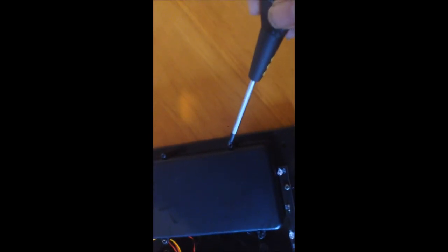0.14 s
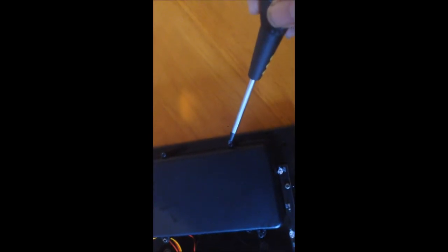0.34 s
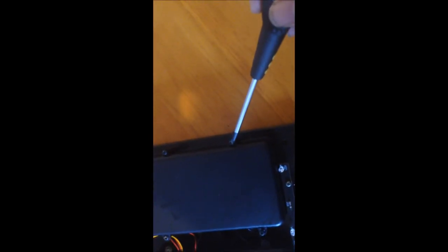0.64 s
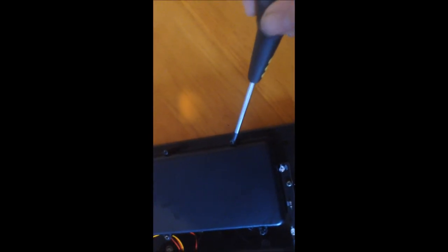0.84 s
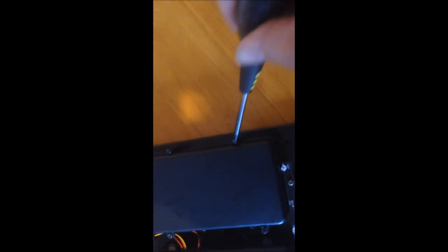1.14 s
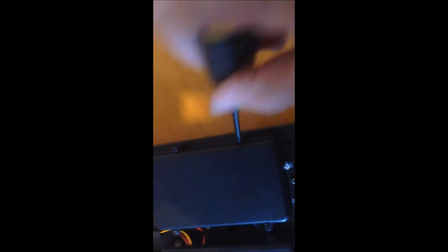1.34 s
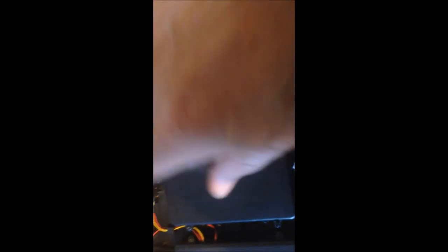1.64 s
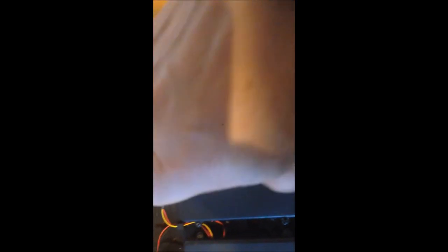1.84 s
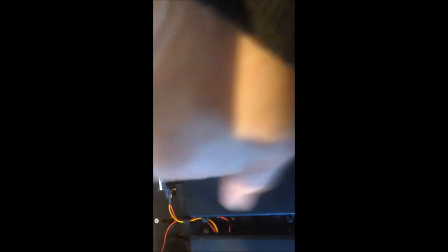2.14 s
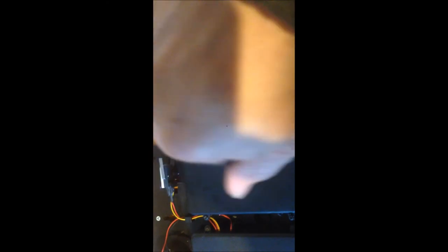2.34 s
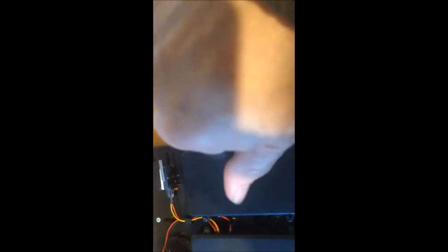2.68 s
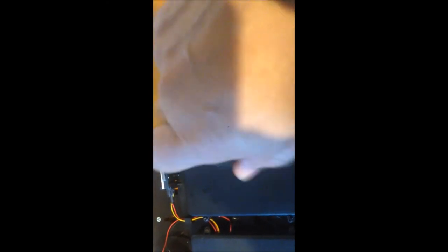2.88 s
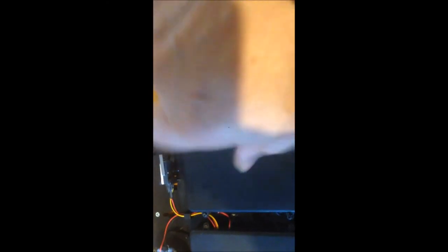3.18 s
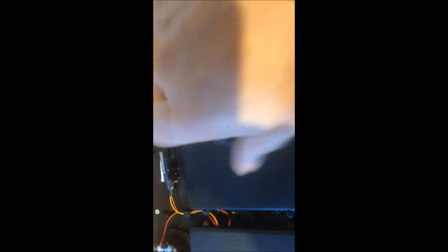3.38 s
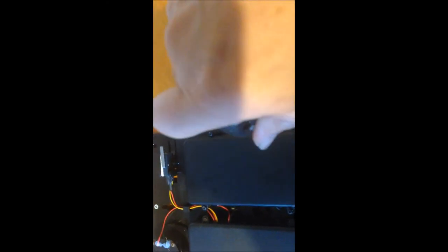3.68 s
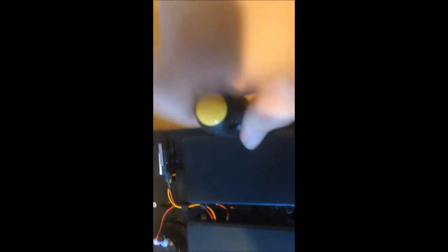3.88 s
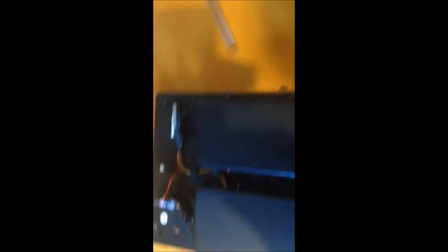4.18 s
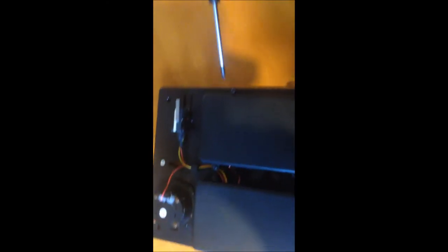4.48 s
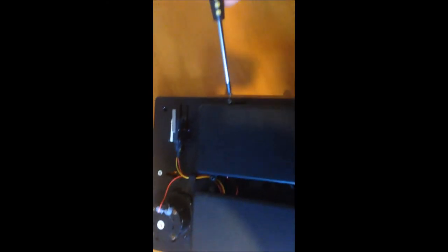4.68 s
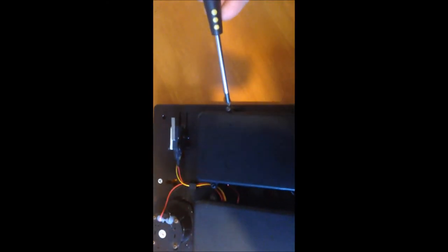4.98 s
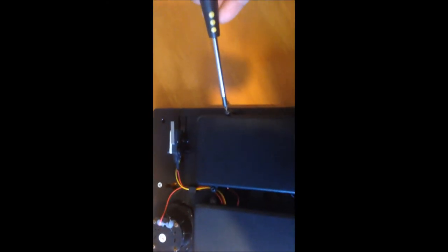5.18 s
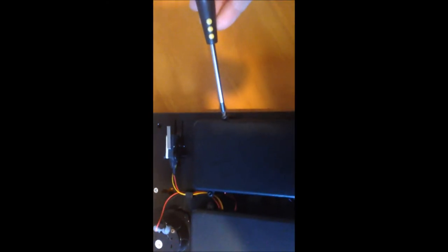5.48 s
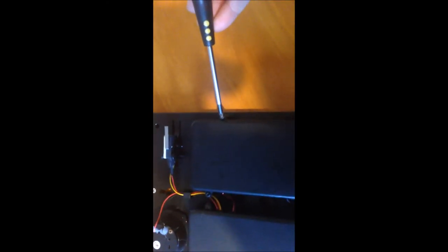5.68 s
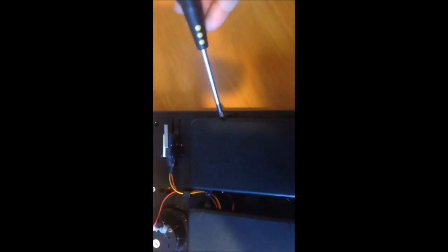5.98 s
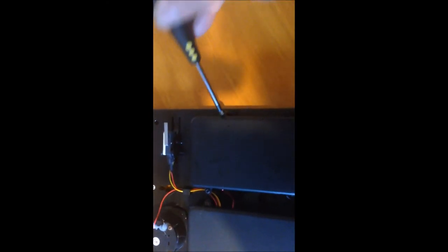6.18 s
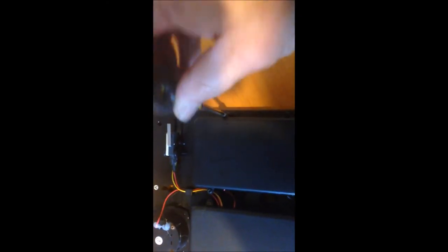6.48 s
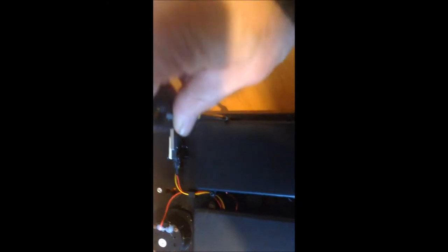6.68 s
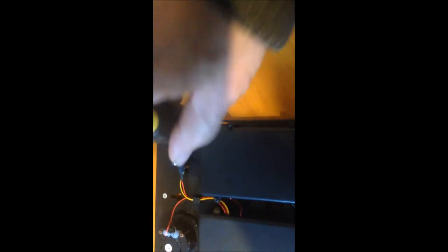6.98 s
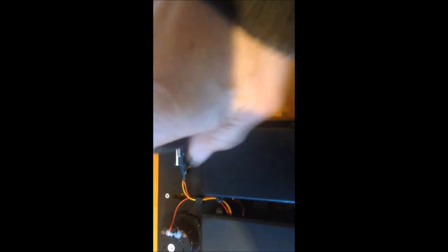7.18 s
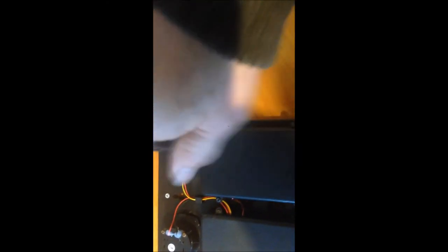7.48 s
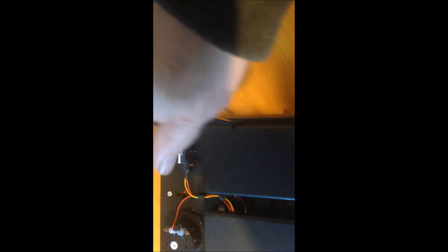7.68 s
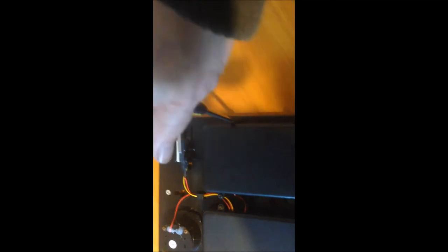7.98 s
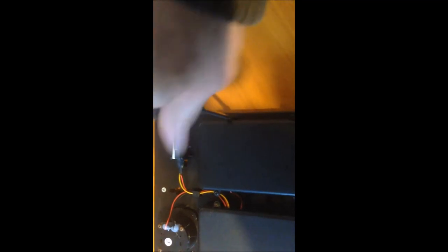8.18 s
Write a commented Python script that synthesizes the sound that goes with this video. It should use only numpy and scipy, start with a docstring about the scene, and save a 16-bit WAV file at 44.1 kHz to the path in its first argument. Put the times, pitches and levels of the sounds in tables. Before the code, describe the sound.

Close, dry clicks and hollow knocks of a screwdriver on a plastic case, loudest early on, followed by light rubbing, small chirps and dull bumps.

```python
"""Screwdriver on a plastic cover

A screwdriver works the screws of a plastic cover on a hollow case, close by in a small quiet room.
The tip taps, scrapes and snaps into a screw head, slips as it is turned, then moves to a second screw.
Contacts are noise bursts ringing decaying plate modes; scrapes are rough noise ringing the same modes.
Caught tips chirp as narrow-band noise; the hand, the leaning case and the rumble and hiss are shaped noise.
"""
import sys
import numpy as np
from scipy import signal
from scipy.fft import rfft, irfft, next_fast_len
from scipy.io import wavfile
from scipy.ndimage import map_coordinates

SR = 44100
rng = np.random.default_rng(int(sys.argv[2]) if len(sys.argv) > 2 else 0)


def dump_mix(stems):
    """Bounce the given channels to the path in sys.argv[1] as a 16-bit WAV at rate SR."""
    frames = np.atleast_2d(stems).T  # one column per channel
    limited = np.clip(frames, -1, 1)  # hard clip at full scale
    pcm = np.round(limited * 32767).astype(np.int16)
    wavfile.write(sys.argv[1], SR, pcm)


N = 367397  # samples


def amp(db):
    """Logarithmic level: decibels to amplitude gain."""
    return 10 ** (np.asarray(db) / 20)


def unit(x):
    """Normalisation: x scaled to rms 1."""
    return x / np.sqrt(np.mean(x ** 2) + 1e-20)


def along(points, hz):
    """Interpolation of (frequency, value) points on a logarithmic frequency axis."""
    f, v = np.transpose(points)
    return np.interp(np.log(hz + 1), np.log(f + 1), v)


def filtered(x, response):
    """Linear filtering: the spectrum of x times a response of frequency."""
    m = next_fast_len(len(x) + 8192)
    hz = np.fft.rfftfreq(m, 1 / SR)
    return irfft(rfft(x, m) * response(hz), m)[:len(x)]


def noise(spectrum, size):
    """Spectral shaping: white noise coloured by (Hz, dB) points, at rms 1."""
    white = rng.standard_normal(size)
    return unit(filtered(white, lambda hz: amp(along(spectrum, hz))))


def fade(t, t60):
    """Exponential free decay, 60 dB down after t60 seconds."""
    return np.exp(-np.log(1000) * t / np.maximum(t60, 1e-4))


def add(track, s, sound):
    """Superposition: mix a sound into the track at time s."""
    start = max(round(s * SR), 0)
    track[start:start + len(sound)] += sound[:max(len(track) - start, 0)]


# Spectrum of the room rumble and hiss: freq_hz [Hz], relative level_db [dB]
AIR_SPECTRUM = [(20, -41), (40, -28.5), (65, -19), (110, -10), (150, -1.5), (300, -2.5), (450, -14.5),
                (650, -17), (1100, -23), (1700, -17.5), (2600, -16.5), (4200, -15.5), (8000, -19.5),
                (14000, -21)]


def background(level_db=-63.5):
    """Stationary noise: steady room rumble and microphone hiss."""
    return amp(level_db) * noise(AIR_SPECTRUM, N)


def wobble(t, rate):
    """Random modulation: a smooth random curve over the times t, with rate knots a second."""
    knots = rng.standard_normal(int(t[-1] * rate) + 4)
    return map_coordinates(knots, [t * rate])


def spell(t, start, end, ease):
    """Gaussian-edged gate: 1 from start to end, easing in before and out after."""
    return np.exp(-((t - np.clip(t, start, end)) / ease) ** 2)


# Spectrum of the hand rubbing the case: freq_hz [Hz], relative level_db [dB]
RUB_SPECTRUM = [(25, -17), (75, -0.5), (140, -5), (290, -0.5), (500, -7), (1000, -12.5), (1600, -27),
                (5000, -28)]
# The hand shifts on handle and case: start_s [s], end_s [s], level_db [dB, before the trim in hand()]
HAND_SHIFTS = [(1.163, 1.377, -60.5), (1.9, 2.03, -58.5), (2.357, 3.4, -61.5), (3.95, 4.15, -66.5),
               (5.164, 5.686, -63.5), (6.942, 7.25, -62), (7.506, 8.332, -64)]


def hand(rest_db=-67.5, ease_s=.14, trim_db=-4, lumpy_db=3, rate=22):
    """Friction noise with powers added: dull, uneven rubbing of the case, louder at each shift."""
    t = np.arange(N) / SR
    power = amp(rest_db) ** 2  # the hand merely holding on
    for start, end, db in HAND_SHIFTS:
        power = power + amp(db) ** 2 * spell(t, start, end, ease_s)
    pushes = amp(trim_db + lumpy_db * wobble(t, rate))
    return np.sqrt(power) * pushes * noise(RUB_SPECTRUM, N)


# Reverberation time of the room: freq_hz [Hz], t60_s [s]
ROOM_DECAY = [(100, 0.27), (260, 0.3), (700, 0.23), (1900, 0.19), (5000, 0.15), (12000, .12)]
# Colour of the room's answer: freq_hz [Hz], gain_db [dB]
ROOM_COLOUR = [(250, 0), (900, -5), (2000, -2), (4000, -8.5), (6000, -1), (12000, -12)]


def in_room(x, wet_db, gap_s=.006):
    """Reverberation by convolution: x plus a fresh noise tail whose treble is weaker and dies first."""
    hz, t, z = signal.stft(rng.standard_normal(SR // 2), SR, nperseg=256)
    decaying = z * fade(t, along(ROOM_DECAY, hz)[:, None])
    tail = signal.istft(decaying, SR, nperseg=256)[1]
    tail = np.pad(tail / np.linalg.norm(tail), (round(gap_s * SR), 0))
    tail = filtered(tail, lambda f: amp(along(ROOM_COLOUR, f)))
    return x + amp(wet_db) * signal.fftconvolve(x, tail)[:len(x)]


# Modes of the cover; their strength depends on how the tip bears on it: freq_hz [Hz], t60_s [s],
# loose_db [dB, tip loose on the first screw], pressed_db [dB, pressed into it],
# second_db [dB, at the second screw]
COVER_MODES = [(74.66, 0.12, -25, -18, -13.5), (114.4, 0.18, -15, -13, -12), (142, .22, -12, -10, -10.5),
               (217, 0.13, -20, -10, -11.5), (276.3, 0.16, 1, -1, -13.5), (331.6, 0.082, -7.5, 2, -3),
               (436, 0.07, -10, -5.5, -6.5), (539, 0.047, -4, -6, -9), (683.5, 0.054, -1.5, -9.5, -7.5),
               (875, 0.05, 0.5, -11, -8), (965, 0.046, 0, -2.5, 6.5), (1085.7, .055, -1.5, -3, -7),
               (1159, 0.069, -5, -9.5, -16), (1386, 0.085, -21, -19.5, -37), (1516, 0.05, -17.5, -17, -10),
               (1723, 0.085, -14.5, -15, -17), (2240, 0.017, -5.5, -26, -7), (2534, 0.061, -16.5, -20, -12),
               (2745, 0.078, -8, -17, -9.5), (2964, 0.026, -5, -1.5, -4), (3450, 0.026, -1, 0, -2.5),
               (3780, .03, -11.5, -9, 4), (4163, 0.034, -5, -10, -2), (4760, 0.02, -12, -27, -10),
               (6560, 0.031, -22.5, -22, -39)]
PRESSED_S, SECOND_SCREW_S = 2.9, 4.5  # when the tip goes in, and when it is at the second screw


def cover_ring(s, t, scatter_db=2.5, build_cycles=0.39):
    """Modal superposition: plate modes answer a tap at time s, building up as the wave crosses."""
    hz, t60, *levels = np.transpose(COVER_MODES)[:, :, None]
    bearing = int(s > PRESSED_S) + int(s > SECOND_SCREW_S)
    level = levels[bearing] + scatter_db * rng.standard_normal(hz.shape)
    build = 1 - np.exp(-t / (build_cycles / np.maximum(hz, 600)))
    vibration = np.sin(2 * np.pi * (hz * t + rng.random(hz.shape)))  # random phases
    return np.sum(amp(level) * build * fade(t, t60) * vibration, axis=0)


# Spectrum of loose parts in the case: freq_hz [Hz], relative level_db [dB]
RATTLE_SPECTRUM = [(60, -12.5), (250, 0.5), (500, 6), (1000, -1.5), (1500, -4), (2400, -4.5), (4000, -7.5),
                   (6000, -20), (12000, -40.5)]


def rattle(t, t60=0.28, lumpy_db=3.0, rate=260, delay_s=0.0097):
    """Secondary excitation: loose parts buzz on in uneven bursts after a blow."""
    bursts = amp(lumpy_db * wobble(t, rate))
    onset = 1 - np.exp(-(t / delay_s) ** 2)
    return noise(RATTLE_SPECTRUM, len(t)) * bursts * fade(t, t60) * onset


def causal(gain):
    """Minimum phase by the folded cepstrum: the response has this gain and nothing precedes the blow."""
    cepstrum = irfft(np.log(np.maximum(gain, 1e-6)))
    half = len(cepstrum) // 2
    cepstrum[1:half] *= 2
    cepstrum[half + 1:] = 0
    return np.exp(rfft(cepstrum))


# Edges of the adjoining bands in which a blow is balanced: freq_hz [Hz]
BANDS = [30, 200, 380, 750, 1400, 2500, 5500, 15000]


def voiced(blow, levels_db):
    """Band equalisation: the blow's first 25 ms are lifted towards the given level in each band."""
    spectrum, hz = rfft(blow), np.fft.rfftfreq(len(blow), 1 / SR)
    points = []
    for lo, hi, db in zip(BANDS, BANDS[1:], levels_db):
        opening = irfft(spectrum * (hz > lo) * (hz < hi))[:SR // 40]
        lift_db = db - 20 * np.log10(np.std(opening))
        # a plateau within the band, sloping to its neighbours
        points += [(lo * 1.15, lift_db), (hi / 1.15, lift_db)]
    return irfft(spectrum * causal(amp(along(points, hz))))


# Contacts of the tip: start_s [s], level_db [dB, before the band colours below],
# weight_db [dB, weight behind the tip], hollow_db [dB, hollow ring], sharpness [dB per octave]
TIP_CONTACTS = [(.2549, -39, -6, 3, 1.5), (.324, -62.5, 8, 3.5, 1.5), (.4991, -49, -9, 3, 3.5),
                (.5825, -39.5, -16, 8, 2), (.6823, -36.5, -7, 4.5, 6.3), (1.047, -74.5, 15, 10, -6),
                (1.2669, -33.5, -1, 3, 1.4), (1.7977, -17.5, -10, -2, 0), (2.248, -59.5, 8, 1.5, -1.5),
                (2.37, -59, 3.5, 0, -1), (2.551, -67.5, 11, -1, 2.5), (2.672, -46.5, 2.5, 3, -0.1),
                (2.829, -44.5, 1, 1, -7), (2.845, -54.5, 7, 3, -5), (2.9579, -55, 4, 4.5, 0.8),
                (3.0075, -49.5, -1, -6, -5), (3.1339, -27.5, -5.5, -2.5, 0.3), (3.239, -57.5, 4, 1, -2.5),
                (3.3031, -56.5, 1, -2, -3), (3.3245, -61, 2.5, 0, 4.5), (3.4485, -29, -5.5, -1.5, -1.5),
                (3.554, -55.5, 2.5, 2.5, -3), (3.9256, -41.5, -0.5, 0.5, -10.5),
                (4.0035, -45, 8.5, 1, -3.2), (4.936, -64.5, 7.5, -3, 4), (5.4358, -40.5, -12, 4, 6),
                (6.4723, -47, -8, -1, -8), (6.497, -59, 2, 0, -1), (6.528, -52.5, -5, 0.5, -7),
                (6.643, -64.5, 5.5, -1, 1), (6.846, -62.5, 1, 6, -1), (7.1253, -63.5, 7, 3, 1),
                (7.148, -49, -4.5, -0.5, -4.5), (7.5323, -44.5, -16.5, 1, -6), (7.663, -59.5, 1, 0.5, 0),
                (7.694, -77.5, 16, -4, 4), (7.847, -52.4, -4.5, 0, -5.5), (7.9508, -53.5, -2, -2, -5.5),
                (8.131, -58, 1, -2.5, -8), (8.2509, -60.5, 9, -0.5, -7)]
# Spectrum of the contact noise: freq_hz [Hz], relative level_db [dB]
CRACK_SPECTRUM = [(30, -23.5), (300, 3.5), (900, -1.5), (1600, -10.5), (3800, -1.5), (6000, -13),
                  (9000, -24), (15000, -36)]
# Colour of an ordinary contact: freq_hz [Hz], level_db [dB]
CONTACT_TONE = [(77, -9.5), (276, -0.5), (534, -2), (1025, -1), (1870, -12.5), (3700, -10), (9000, -24.5)]
# Weight behind the tip booms the case: freq_hz [Hz], share of weight_db [dB per dB]
WEIGHT_SHARE = [(77, 1.6), (276, .8), (534, .55), (1025, 0.013)]
# A tip that does not damp the cover lets it ring hollow: freq_hz [Hz], share of hollow_db [dB per dB]
HOLLOW_SHARE = [(77, -0.6), (276, 0.97), (534, -.3), (1025, 0)]
# A sharp tip lifts the treble and spares the body: freq_hz [Hz], lift [octaves]
SHARP_LIFT = [(276, 0), (534, 0.02), (1025, 0), (1870, 0.8), (3700, 2), (9000, 2.5)]
# A contact at FIRM_DB or above chatters for CHATTER_S; twice as long for each such drop in level
CHATTER_S, FIRM_DB, CHATTER_DOUBLES_DB = .0055, -36.5, 33


def contacts(rows, wet_db=-8, rattle_db=-9, rattle_growth=0.24, rise_share=0.27):
    """Impact excitation: brief chatter rings the cover; lighter contacts are longer and softer in onset."""
    track, t = np.zeros(N), np.arange(SR // 2) / SR
    hz = np.sqrt(np.multiply(BANDS[:-1], BANDS[1:]))  # band centres
    for s, db, weight_db, hollow_db, sharpness in rows:
        levels = db + along(CONTACT_TONE, hz)
        levels = levels + weight_db * along(WEIGHT_SHARE, hz)
        levels = levels + hollow_db * along(HOLLOW_SHARE, hz)
        levels = levels + sharpness * along(SHARP_LIFT, hz)
        chatter_s = CHATTER_S * 2 ** (max(FIRM_DB - db, 0) / CHATTER_DOUBLES_DB)
        crack = noise(CRACK_SPECTRUM, len(t)) * np.exp(-(t / chatter_s) ** 2)
        press = 1 - np.exp(-t / (rise_share * chatter_s))
        blow = in_room(press * (cover_ring(s, t) + crack), wet_db)
        # a harder blow shakes the loose parts more than in proportion
        shaken = amp(rattle_db + rattle_growth * max(levels)) * rattle(t)
        add(track, s, voiced(blow + shaken, levels))
    return track


# The tip drags over the plastic: crest_s [s], level_db [dB, at the crest before the room],
# rise_s [s, for the last 20 dB up to the crest], brightness [dB per octave]
TIP_SCRAPES = [(.489, -43, 0.0083, -1.5), (.562, -40, 0.01, 2), (1.265, -48, 0.0099, 3),
               (1.793, -33, 0.014, -5.5), (2.67, -46, 0.0091, -9), (4.95, -62.5, 0.022, -1.5),
               (5.175, -46.5, 0.023, -2), (5.285, -56.5, 0.086, -5), (5.338, -59, 0.14, 2.5),
               (5.63, -55, 0.06, 3), (5.76, -61, 0.023, -0.5), (6.253, -47.5, 0.06, -1.5),
               (7.01, -60, 0.044, -3.5), (7.545, -58, 0.037, 12), (7.69, -64, 0.24, 1.5),
               (8.29, -62, 0.24, 1.5)]
# Spectrum of the scraping grit: freq_hz [Hz], relative level_db [dB]
GRIT_SPECTRUM = [(200, -8), (550, -6.5), (900, 1), (1250, 1), (1700, -5.5), (2500, -6.5), (3600, -2),
                 (6000, -10), (10000, -14.5), (15000, -26.5)]
SCRAPE_FALL = 1.6  # a scrape's fall time over its rise time
# a short dig rings the cover; a longer drag mostly hisses: ring over grit, before the mix is normalised
DIG_RING_DB, DIG_S, RING_DB_PER_DOUBLING, DRAG_RING_DB = 12.5, .014, -19, -10


def scrapes(spiky=0.24, wet_db=-6):
    """Friction excitation: dense tiny slips swell and fade, hissing and ringing the cover."""
    track, t = np.zeros(N), np.arange(SR // 2) / SR
    crest = t.mean()
    for s, db, rise, bright in TIP_SCRAPES:
        doublings = np.log2(max(rise / DIG_S, 1))
        ring_db = max(DIG_RING_DB + RING_DB_PER_DOUBLING * doublings, DRAG_RING_DB)
        slips = rng.standard_normal(len(t))
        # the strength of the slips jumps at random every 50 samples
        jumps = rng.standard_normal(len(t) // 50 + 1).repeat(50)[:len(t)]
        slips = slips * np.exp(spiky * jumps)

        def grit_gain(hz):
            """Spectral tilt: the grit's colour with this scrape's brightness."""
            return amp(along(GRIT_SPECTRUM, hz) + bright * np.log2(np.maximum(hz, 300)))

        grit = unit(filtered(slips, grit_gain))
        ring = unit(signal.fftconvolve(grit, cover_ring(s, t))[:len(t)])
        before, after = (crest - t) / rise, (t - crest) / (SCRAPE_FALL * rise)
        stroke = amp(-20 * np.maximum(before, after))
        scrape = amp(db) * stroke * unit(grit + amp(ring_db) * ring)
        add(track, s - crest, in_room(scrape, wet_db))
    return track


# The screw turns: start_s [s], end_s [s]
TURNS = [(2.38, 2.46), (6.9, 7.05), (7.2, 7.4), (8.1, 8.33)]
# faint ticks of the turning thread: per s, dB, dB either way, weight dB, sharpness dB per octave
TICK_RATE, TICK_DB, TICK_SCATTER_DB, TICK_WEIGHT_DB, TICK_SHARPNESS = 14, -64.5, 4, -3, -1.3


def thread_ticks():
    """Stick-slip of the thread: faint contacts at uneven moments while the screw turns."""
    rows = []
    for start, end in TURNS:
        count = max(round((end - start) * TICK_RATE), 1)
        for k, (when, size) in enumerate(rng.random((count, 2))):
            s = start + (end - start) * (k + when) / count
            db = TICK_DB + TICK_SCATTER_DB * (2 * size - 1)
            rows.append((s, db, TICK_WEIGHT_DB, 0, TICK_SHARPNESS))
    return contacts(rows)


# The dragging tip briefly catches and chirps: start_s [s], level_db [dB, before the envelope],
# pitch_hz [Hz], width_hz [Hz, at half amplitude], t60_s [s]
TIP_CHIRPS = [(5.319, -46.5, 2010, 450, 0.23), (5.594, -51.5, 2560, 600, 0.2),
              (6.303, -45.5, 3200, 553, .25)]


def chirps(rise_s=0.011):
    """Narrow-band resonance: a catch of the tip sounds as a short, rough whistle."""
    track, t = np.zeros(N), np.arange(SR // 2) / SR
    for s, db, hz, width_hz, t60 in TIP_CHIRPS:
        white = rng.standard_normal(len(t))
        whistle = unit(filtered(white, lambda f: 1 / (1 + (2 * (f - hz) / width_hz) ** 2)))
        onset = 1 - np.exp(-(t / rise_s) ** 2)
        add(track, s - rise_s, amp(db) * whistle * fade(t, t60) * onset)
    return track


# Spectrum of the case shifting on the table: freq_hz [Hz], relative level_db [dB]
THUD_SPECTRUM = [(25, -15), (50, -2), (80, 4), (120, -2), (170, -18), (400, -36)]


def lean(start_s=6.43, end_s=8.33, ease_s=0.28, level_db=-68, lumpy_db=7.0, rate=14):
    """Low-frequency noise, modulated: under the hand's weight the case shifts in soft, deep bumps."""
    t = np.arange(N) / SR
    bumps = unit(amp(lumpy_db * wobble(t, rate)) * noise(THUD_SPECTRUM, N))
    return amp(level_db) * spell(t, start_s, end_s, ease_s) * bumps


def scene():
    """Superposition of every source at one microphone."""
    steady = background() + hand()
    tip = contacts(TIP_CONTACTS) + scrapes() + thread_ticks() + chirps()
    return (steady + tip + lean())[None]


def record(dry, top_hz=15200):
    """Band limiting: the recorder keeps nothing above its upper limit."""
    return np.array([filtered(channel, lambda hz: hz < top_hz) for channel in dry])


dry = scene()
out = record(dry)
dump_mix(out)
```